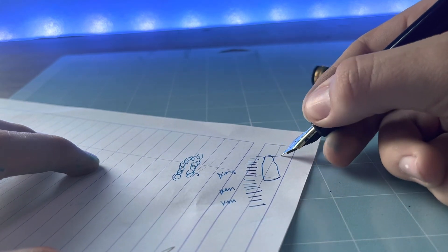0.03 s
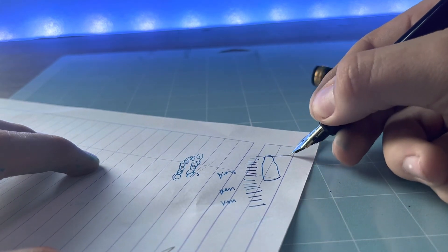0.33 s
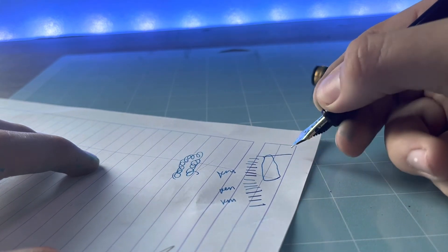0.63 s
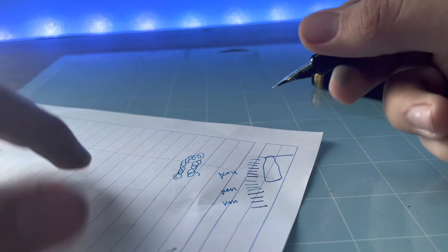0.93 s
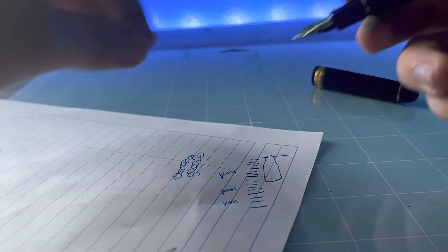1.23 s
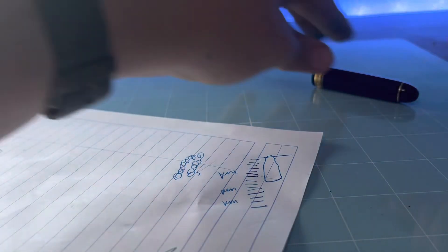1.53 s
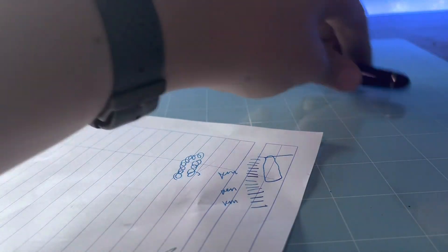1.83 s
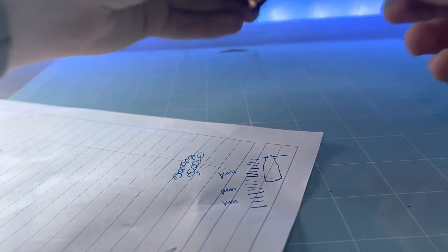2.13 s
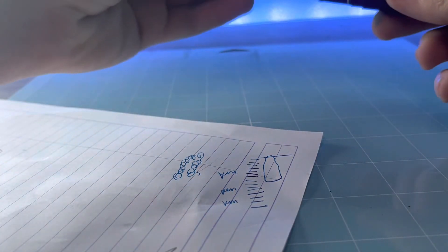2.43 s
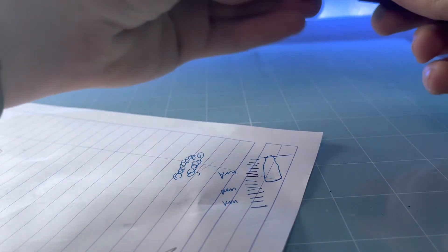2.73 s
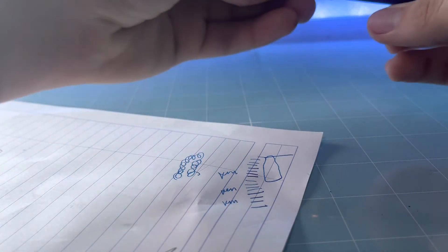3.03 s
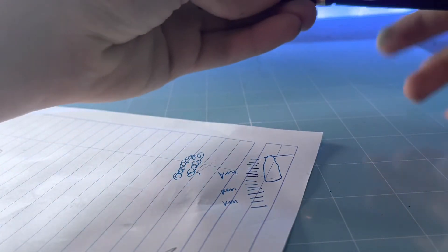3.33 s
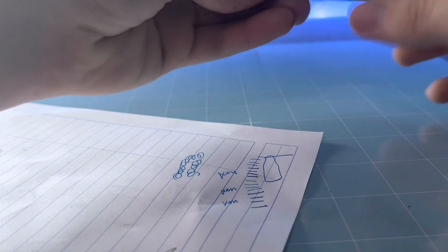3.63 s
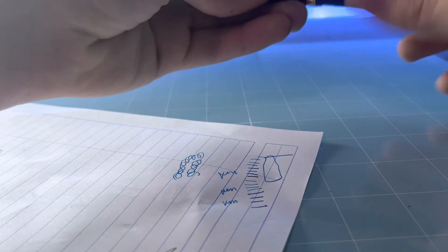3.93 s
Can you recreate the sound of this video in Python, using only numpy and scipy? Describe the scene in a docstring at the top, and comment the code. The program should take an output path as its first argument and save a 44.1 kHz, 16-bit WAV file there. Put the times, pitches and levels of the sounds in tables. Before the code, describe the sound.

Pen being capped with a small rattle and three sharp clicks, following faint paper rustling.

```python
"""Paper rustles softly, then a fountain pen rattles into its cap and clicks sharply three times.
The nib scrapes in quick tiny slips and the barrel knocks home, ringing the cap and the air inside it.
Each click is a hard blow of cap on barrel that leaves the barrel ringing for a moment.
Behind the pen, in a quiet room, are steady ventilation, a low swelling drone and a faint tick each second.
"""
import sys
import numpy as np
from scipy import signal
from scipy.fft import rfft, irfft
from scipy.io import wavfile

SR = 44100
rng = np.random.default_rng(int(sys.argv[2]) if len(sys.argv) > 2 else 0)


def file_out(sig):
    """Save sig as 16-bit WAV at sys.argv[1]."""
    # one column per channel
    cols = np.atleast_2d(sig).T
    # limit, then scale
    lim = np.clip(cols, -1, 1)
    pcm = np.round(lim * 32767).astype(np.int16)
    wavfile.write(sys.argv[1], SR, pcm)


N = 176400
HIT_T = np.arange(4096) / SR  # time axis of one hit, in seconds

# tones at which the barrel rings: f/Hz, level/dB, time to fade by 60 dB/s
BARREL_TONES = [(3597, 3, 0.039), (3820, 3, 0.021), (5300, -12, 0.0072)]


def clicks(thud_db=-21.5):
    """The cap hits the barrel and bounces once; the barrel rings and the pen thuds in the hand."""
    # clicks: t/s, level/dB, tilt/dB per octave, barrel ring/dB, bounce delay/s, bounce/dB, left lean/dB
    blows = [(3.4404, -19.5, 0.96, -23, .0012, -15.5, 1), (3.6396, -23.5, 2, -17, .0018, -16, 1),
             (3.8024, -25.5, 0, -8.5, .002, -20, 2)]
    # tone colour of a click: f/Hz, level/dB
    spectrum = [(150, -8.5), (400, -15), (650, -3), (1000, -11.5), (1500, -9.5), (2600, -17), (3500, -6),
                (4300, -0.5), (5400, -2.5), (6100, -6), (7000, -2.5), (8550, 1.5), (9100, -7.5),
                (11000, -15), (12500, -24.5), (15500, -29.5)]
    out = np.zeros((2, N))
    for s, db, tilt_db, barrel_db, bounce_s, bounce_db, left_db in blows:
        blow = bend(contact(chatter_db=-5, chatter_s=0.0013))
        add(blow, bounce_s, amp(bounce_db) * contact(chatter_db=6.5, chatter_s=0.0012))
        snap = unit_hit(colour(blow, spectrum, tilt_db))
        thud = amp(thud_db) * ring([(241, -1.8, 0.051), (406, -0.16, 0.022)])
        click = np.zeros(N)
        add(click, s, amp(db) * (snap + amp(barrel_db) * ring(BARREL_TONES) + thud))
        out += room(pan(click, left_db), wet_db=-13, apart=0.33)  # the pen moves: a new tail each time
    return out


def bend(blow, longest_s=0.001069, top_hz=10010):
    """A blow runs along the barrel as bending waves, and the low ones arrive later."""
    size = 2 * len(blow)
    hz = np.fft.rfftfreq(size, 1 / SR)
    delay = longest_s * np.maximum(1 - hz / top_hz, 0)
    phase = 2 * np.pi * np.cumsum(delay) * hz[1]
    return irfft(rfft(blow, size) * np.exp(-1j * phase))[:len(blow)]


def knocks():
    """The pen rattles into the cap and settles in place."""
    # knocks: t/s, level/dB, tilt/dB per octave, cap ring/dB, nib ring/dB, air ring/dB, air pitch/Hz
    hits = [(2.6435, -45.5, -2, -4.5, -1.5, -17, 1663), (2.7047, -42.5, -1.5, -9.5, -5, 17.5, 1760),
            (2.7121, -38.5, 3, -2.5, -11, 12, 1640), (2.7148, -35.5, 0, -11, -12, 2, 1646),
            (2.7215, -56, 3, -19, -4, 5, 1750), (2.7287, -40, 3, -8.5, 3.5, -11, 1500),
            (2.7320, -35.5, 6, -7.5, -1, -7, 1340), (2.7392, -39.5, 3, 3, -3.5, -4.5, 1200),
            (2.7455, -43, 3.5, -4, -4.5, -7, 1100), (2.7735, -50, 2.5, -6, -8.5, -17, 1000),
            (2.7992, -33.5, 3, -2.5, -18.5, -5, 950), (2.8076, -31, 3, -9, -15.5, -1.5, 879.5),
            (2.8096, -33, -1, 0.5, -19, -4, 1080), (2.9785, -61, -1.5, -8, -18, -8, 1040),
            (3.0068, -72.5, 11, 2, -18, -4, 1000), (3.1587, -42.5, -2.5, -14, -18, -10, 1010),
            (3.2088, -53, -10, -8, -11, 1, 1130), (3.2220, -41, -2.5, -17, -24, -8.5, 830),
            (3.6671, -50.5, -8, -12, -19, -5.5, 965)]
    out = np.zeros(N)
    for s, db, *shape in hits:
        add(out, s, amp(db) * knock(*shape))
    return out


def knock(tilt_db, cap_db, nib_db, hollow_db, hollow_hz, hollow_fade_s=0.024):
    """One plastic tap rings the cap, the nib and the air in the hollow of the cap."""
    # tone colour of the tap: f/Hz, level/dB
    spectrum = [(200, -13.5), (450, -4), (850, 3.5), (1500, 4.5), (2700, -1), (3700, 0.5), (4700, -4),
                (5500, 2.5), (6700, -6), (8500, -5.5), (10500, -15), (12500, -19.5), (14000, -27),
                (15500, -33)]
    # tones of the cap and of the nib: f/Hz, level/dB, time to fade by 60 dB/s
    cap_tones = [(3940, -4, 0.026), (3690, -2, 0.021), (5500, -12.5, 0.0023)]
    nib_tones = [(7370, 0.5, 0.029), (7400, -8.5, .015), (12200, -21, .015)]
    tap = unit_hit(colour(contact(chatter_db=17, chatter_s=0.0023), spectrum, tilt_db))
    hollow = ring([(hollow_hz, 0, hollow_fade_s)])
    return tap + amp(cap_db) * ring(cap_tones) + amp(nib_db) * ring(nib_tones) + amp(hollow_db) * hollow


def scrape(slips_per_s=310, uneven=0.18, spread_db=2):
    """The nib stutters along the cap wall in quick uneven slips, each a tiny knock."""
    # strength of the slips: t/s, level/dB
    strength = [(2.646, -54.5), (2.660, -51), (2.676, -44), (2.700, -46.5), (2.745, -55), (2.760, -57),
                (2.785, -59.5)]
    times, levels = np.transpose(strength)
    slip_times = np.arange(times[0], times[-1], 1 / slips_per_s)
    out = np.zeros(N)
    for s, (late, size) in zip(slip_times, rng.standard_normal((200, 2))):
        slip = knock(tilt_db=-0.5, cap_db=-5.5, nib_db=-6, hollow_db=-9, hollow_hz=1660)
        db = np.interp(s, times, levels) + spread_db * size
        add(out, s + late * uneven / slips_per_s, amp(db) * slip)
    return out


def pings():
    """Light bounces that only set the barrel ringing."""
    # bounces: t/s, level/dB
    bounces = [(3.1595, -53), (3.1678, -58.5), (3.8125, -44)]
    out = np.zeros(N)
    for s, db in bounces:
        add(out, s, amp(db) * ring(BARREL_TONES))
    return out


def paper(fade_s=0.0073, grain_db=4, grain_hz=500):
    """Hand and pen brush the paper with a grainy hiss; it crackles under nib and fingers."""
    # brush strokes: t/s, length/s, level/dB, tilt/dB per octave
    strokes = [(0, .08, -76, -10), (0.129, 0.12, -75.5, -9.5), (.28, .12, -83, -10),
               (0.704, .03, -66.5, -7), (0.728, 0.207, -68, 7), (0.937, .13, -81, 3.5),
               (1.34, 0.097, -79, -8), (1.634, 0.05, -73.5, -0.5), (1.745, 0.016, -80, 0),
               (2.02, 0.04, -90, 12.5), (3.173, 0.048, -73, -6), (3.214, 0.031, -61.5, -3)]
    # crackles: t/s, level/dB, tilt/dB per octave
    crackles = [(.06, -67, -14), (0.171, -72, -14), (.205, -71, -2.5), (.23, -82, -11), (0.7098, -67, -7.5),
                (0.7209, -56.5, -6.5), (0.728, -58, 5), (0.7577, -51, 2), (.7615, -56, -10.5),
                (0.7726, -50, 2), (0.8248, -57, 2), (.8510, -57.5, -2), (0.9304, -54, 3), (0.97, -67, -8),
                (1.676, -68, 0)]
    # tone colour of the paper: f/Hz, level/dB
    spectrum = [(600, -19.5), (1800, -3), (3200, -3.5), (4400, -1), (6000, 4), (8000, 1.5), (10000, -1),
                (12500, -12), (13700, -25.5), (15500, -30)]
    out = np.zeros(N)
    hiss = unit_rms(rng.standard_normal(N) * amp(grain_db * wander(grain_hz)))
    for s, length, db, tilt_db in strokes:
        t = np.arange(0, length, 1 / SR)
        stroke = unit_rms(colour(hiss[round(s * SR):][:len(t)], spectrum, tilt_db))
        fade = np.clip(np.minimum(t, length - t) / fade_s, 0, 1)
        add(out, s, amp(db) * stroke * fade)
    for s, db, tilt_db in crackles:
        crackle = colour(contact(chatter_db=12, chatter_s=0.0015), spectrum, tilt_db)
        add(out, s, amp(db) * unit_hit(crackle))
    return out


def ventilation():
    """Steady air noise, shaped by the room's resonances; its bass is nearly the same on both sides."""
    # tone colour of the noise: f/Hz, level/dB
    spectrum = [(15, -25.5), (30, -4.5), (47, 4), (72, -4.5), (100, -11.5), (132, -4), (160, -20.5),
                (200, -22), (250, -12.5), (287, -4), (325, -18.5), (440, -30.5), (590, -28.5), (640, -38.5),
                (710, -22.5), (900, -40), (1150, -41), (1500, -37), (1950, -35.5), (2300, -50),
                (2800, -64.5), (5500, -63), (10000, -68), (15000, -79.5)]
    # overall loudness: t/s, level/dB
    loudness = [(0, -45.5), (1.1, -45.5), (1.6, -43.5), (2.6, -44.5), (4, -44)]
    # how alike left and right are: f/Hz, likeness (1 = the same)
    likeness = [(30, 0.93), (300, .98), (700, 0.41), (2000, 0.26), (6000, 1), (14000, 1)]
    # lean to the left: f/Hz, left over right/dB
    balance = [(60, 0), (110, -0.5), (200, -1), (380, 0.5), (700, -4.5), (1290, 5.5), (2380, 15.5),
               (4400, 7), (8120, 0), (15000, -3)]
    hz = np.fft.rfftfreq(N, 1 / SR)
    left, other = rfft(rng.standard_normal((2, N))) * amp(read(spectrum, hz))
    same = read(likeness, hz)
    right = same * left + np.sqrt(1 - same ** 2) * other
    lean = amp(read(balance, hz) / 2)
    noise = unit_rms(irfft(np.array([left * lean, right / lean]), N))
    return noise * amp(np.interp(np.arange(N) / SR, *np.transpose(loudness)))


def drone(waver=0.01184, flutter_db=1.0):
    """Two low tones swell and waver, each with a weak tone an octave above it."""
    # paths of the upper and the lower tone: t/s, f/Hz, level/dB
    upper = [(1.95, 120, -56), (2.25, 132, -46), (2.42, 136, -59.5), (2.7, 124, -58.5), (3.2, 130, -48.5),
             (3.39, 127, -56), (3.62, 131, -39), (3.8, 132, -37), (4, 133, -37.5)]
    lower = [(1.85, 85, -56.5), (2.15, 93.2, -49.5), (2.35, 98.2, -41.5), (2.55, 101.7, -51.5),
             (2.87, 100, -61), (3.18, 98, -43), (3.4, 99.6, -54), (4, 108.1, -50.5)]
    t = np.arange(N) / SR
    out = np.zeros(N)
    for path, octave_db in [(upper, -18.5), (lower, -26)]:
        times, hz, db = np.transpose(path)
        pitch = np.interp(t, times, hz) * (1 + waver * wander(rate_hz=15.5))
        phase = 2 * np.pi * np.cumsum(pitch) / SR
        level = amp(np.interp(t, times, db) + flutter_db * wander(rate_hz=8.8))
        out += np.sqrt(2) * level * (np.sin(phase) + amp(octave_db) * np.sin(2 * phase))
    return out


def ticking(first_s=0.519, every_s=1, peak_db=-75, rise_s=0.021):
    """A far tick, blurred by the room into a soft puff of noise."""
    # tone colour of the tick: f/Hz, level/dB
    spectrum = [(2000, -27), (3600, -7.5), (4600, 2.5), (5600, -11), (9000, -29), (14000, -33)]
    age = (np.arange(N) / SR - first_s) % every_s / rise_s  # 1 at the peak of each tick
    noise = unit_rms(colour(rng.standard_normal(N), spectrum))
    return amp(peak_db) * age * np.exp(1 - age) * noise


def room(x, wet_db, apart, onset_s=0.0032):
    """The room adds two near echoes and a short tail; `apart` makes the tail wider."""
    # how long the tail lasts: f/Hz, time to fade by 60 dB/s
    fade_times = [(200, .3), (1000, 0.15), (3600, 0.24), (8000, 0.25), (14000, 0.16)]
    # tone colour of the tail: f/Hz, level/dB
    spectrum = [(200, 6.5), (1200, 2.5), (2400, 3.5), (3700, 2), (6200, -4.5), (9000, -5), (14000, -1)]
    # echoes from nearby surfaces: delay/s, level/dB
    echoes = [(0.0116, -22.5), (0.026, -26)]
    shared, side = rng.standard_normal((2, SR // 2))
    noise = np.array([shared + apart * side, shared - apart * side])
    hz, t, bands = signal.stft(noise, SR, nperseg=256)
    bands *= amp(read(spectrum, hz)[:, None] - 60 * t / read(fade_times, hz)[:, None])
    tail = signal.istft(bands, SR, nperseg=256)[1]
    tail *= np.minimum(np.arange(tail.shape[1]) / SR / onset_s, 1) ** 2
    tail *= amp(wet_db) / np.linalg.norm(tail[0])
    for s, db in echoes:
        tail[:, round(s * SR)] += amp(db)
    return x + signal.fftconvolve(x, tail, axes=1)[:, :N]


def contact(chatter_db, chatter_s):
    """Two surfaces meet: one sharp spike, then a brief chatter as they touch."""
    envelope = np.exp(-HIT_T / chatter_s) * (1 - np.exp(-2 * HIT_T / chatter_s))
    chatter = unit_hit(rng.standard_normal(len(HIT_T)) * envelope)
    spike = unit_hit(1. * (HIT_T == 0))
    return spike + amp(chatter_db) * chatter


def ring(tones):
    """A struck part rings as dying sine waves, given as f/Hz, level/dB, time to fade by 60 dB/s."""
    waves = (amp(db - 60 * HIT_T / fade_s) * np.sin(2 * np.pi * hz * HIT_T) for hz, db, fade_s in tones)
    return unit_hit(sum(waves))


def colour(x, spectrum, tilt_db=0):
    """Gives a sound a tone colour; a positive tilt, in dB per octave, makes it brighter."""
    hz = np.fft.rfftfreq(len(HIT_T), 1 / SR)
    octaves = np.log2(np.maximum(hz, 500) / 4000)
    log_gain = np.log(amp(read(spectrum, hz) + tilt_db * octaves))
    mirrored = np.concatenate([log_gain, log_gain[-2:0:-1]])
    response = np.fft.ifft(np.exp(np.conj(signal.hilbert(mirrored)))).real  # no sound ahead of a hit
    return signal.fftconvolve(x, response)[:len(x)]


def wander(rate_hz):
    """Smooth random drift with a typical size of 1."""
    hz = np.fft.rfftfreq(N, 1 / SR)
    return unit_rms(irfft(rfft(rng.standard_normal(N)) * np.exp(-(hz / rate_hz) ** 2), N))


def amp(db):
    """Turns decibels into a gain."""
    return 10 ** (np.asarray(db) / 20)


def unit_rms(x):
    """Scales a sound to an average strength (rms) of 1."""
    return x / np.sqrt(np.mean(x ** 2) + 1e-30)


def unit_hit(x, samples=88):
    """Scales a hit to the energy of 2 ms of sound at rms 1."""
    return x * np.sqrt(samples / (np.sum(x ** 2) + 1e-30))


def read(table, hz):
    """Reads between the rows of a table, with frequency spaced by octaves."""
    f, value = np.transpose(table)
    return np.interp(np.log(hz + 1), np.log(f + 1), value)


def add(mix, s, sound):
    """Mixes a sound in, starting at s seconds."""
    part = mix[max(round(s * SR), 0):][:len(sound)]
    part += sound[:len(part)]


def pan(x, left_db):
    """Makes two channels, the left one louder by left_db."""
    return x * amp([[left_db / 2], [-left_db / 2]])


def scene():
    """Pen and paper in the room, over the quiet background."""
    pen = clicks() + room(pan(knocks() + scrape() + pings(), left_db=1.6), wet_db=-11, apart=0.72)
    hum = pan(drone(), left_db=-2.76)
    rustle = room(pan(paper(), left_db=1.3), wet_db=-7.5, apart=0.17)
    return pen + rustle + ventilation() + hum + ticking()


def record(dry, top_hz=15800):
    """The microphone's two openings are out of step in the treble, and the highest treble is cut."""
    # how far the left opening is ahead of the right: f/Hz, phase/rad
    phase_lead = [(500, 0), (1600, -.1), (3200, .7), (4700, .3), (5800, -1), (7000, -1.8), (8450, -3.14),
                  (9700, -4.4), (12000, -6.2), (13500, -7.1), (15400, -8.8)]
    hz = np.fft.rfftfreq(2 * N, 1 / SR)
    lead = np.interp(hz, *np.transpose(phase_lead), left=0)
    pair = irfft(rfft(dry, 2 * N) * np.exp(1j * np.array([lead, -lead]) / 2))[:, :N]
    lowpass = signal.firwin(511, top_hz, window=("kaiser", 9), fs=SR)
    return signal.oaconvolve(pair, lowpass[None], "same")


dry = scene()
out = record(dry)
file_out(out)
```